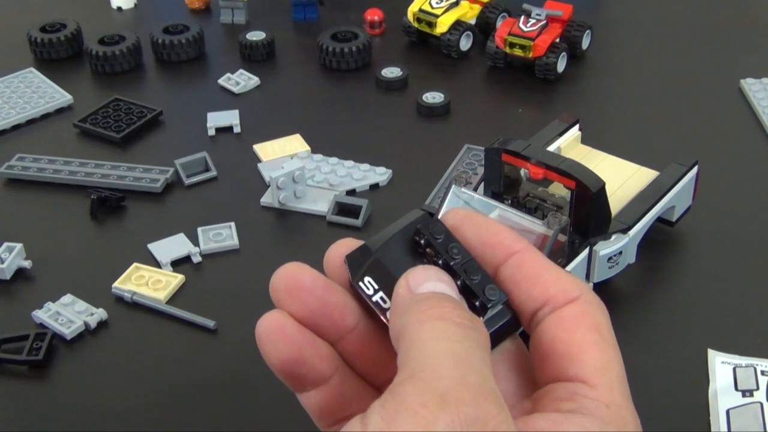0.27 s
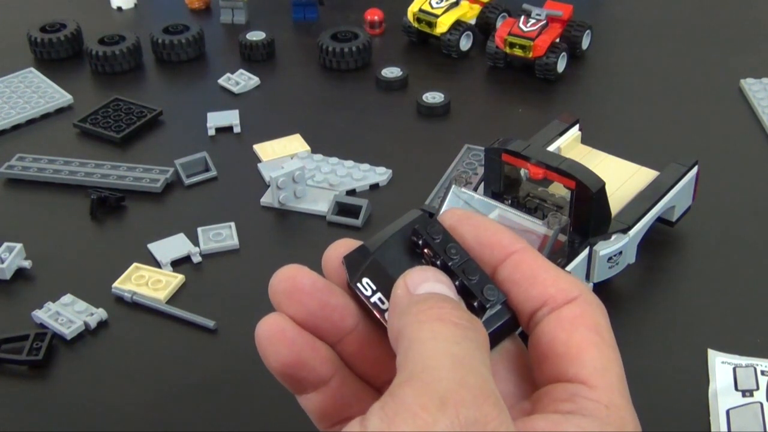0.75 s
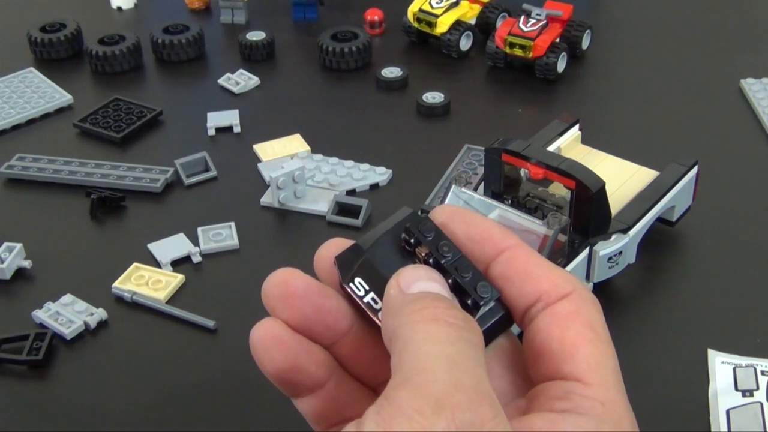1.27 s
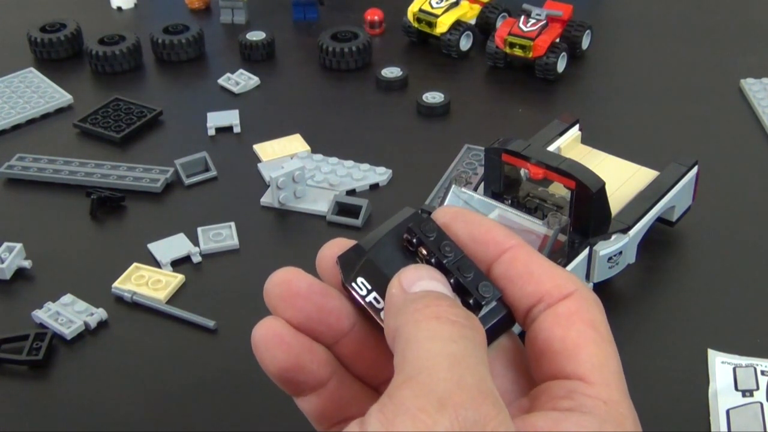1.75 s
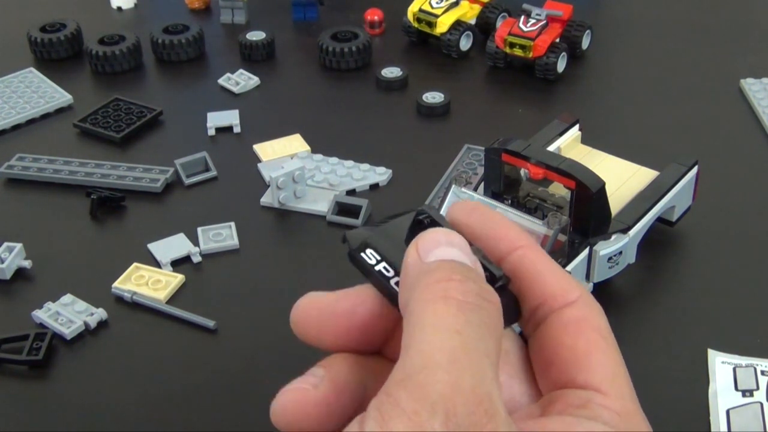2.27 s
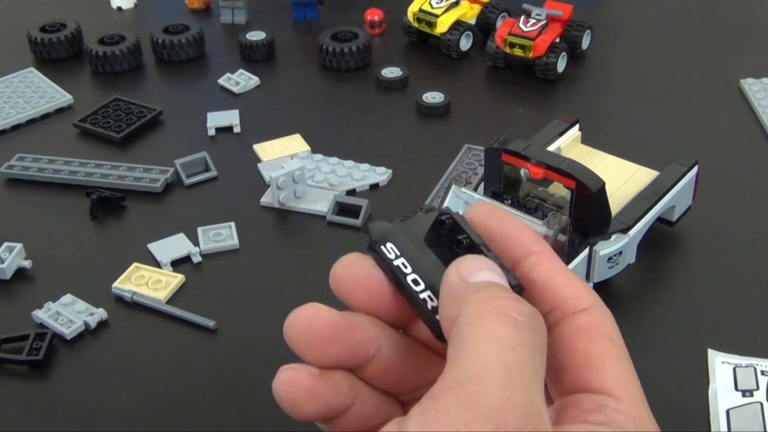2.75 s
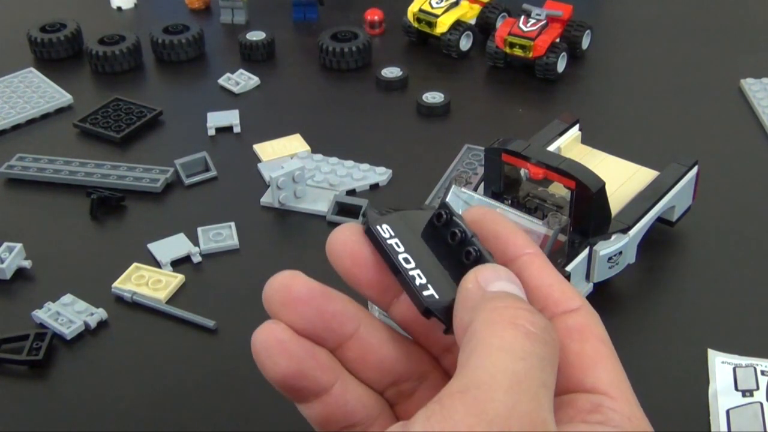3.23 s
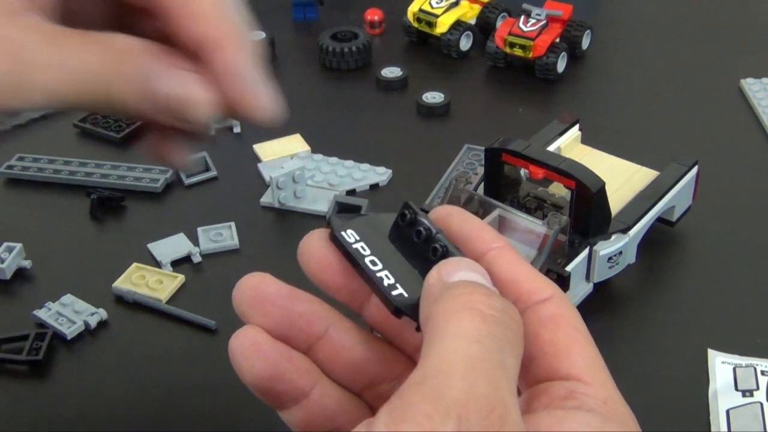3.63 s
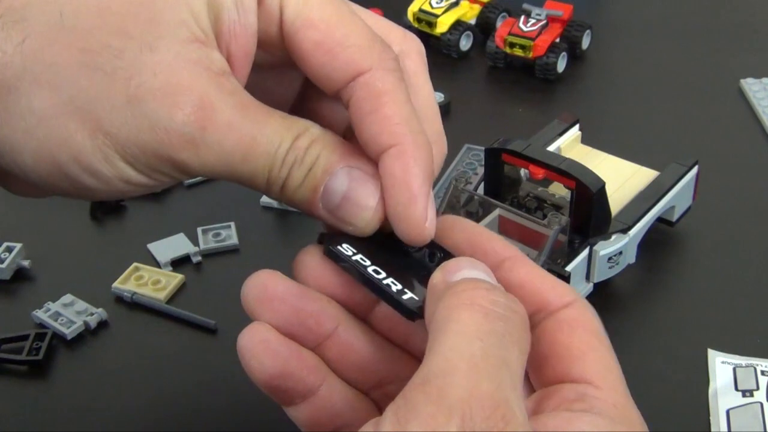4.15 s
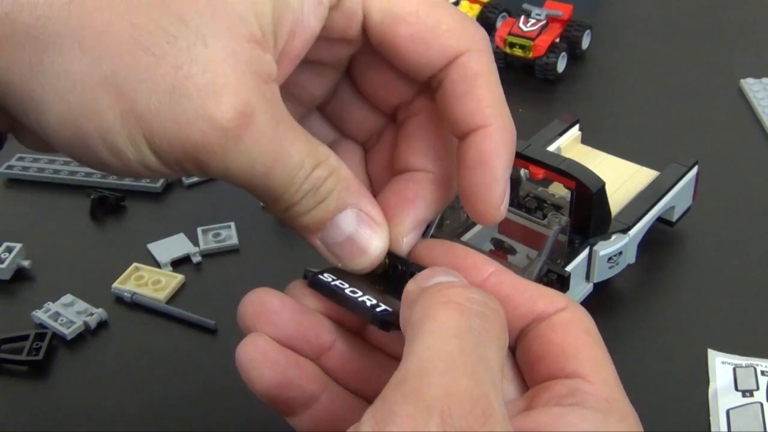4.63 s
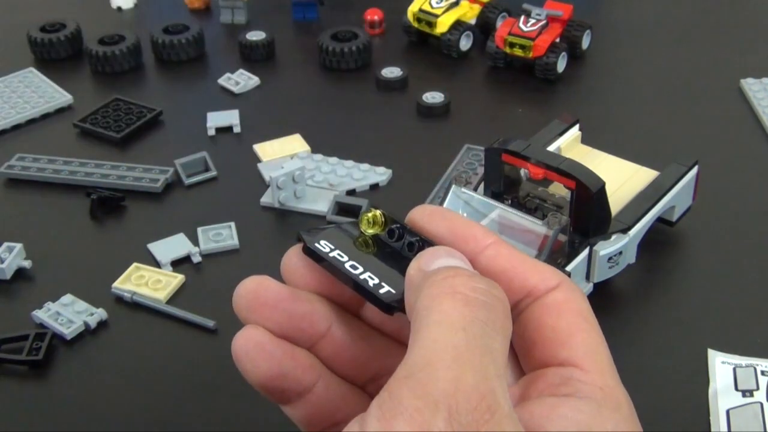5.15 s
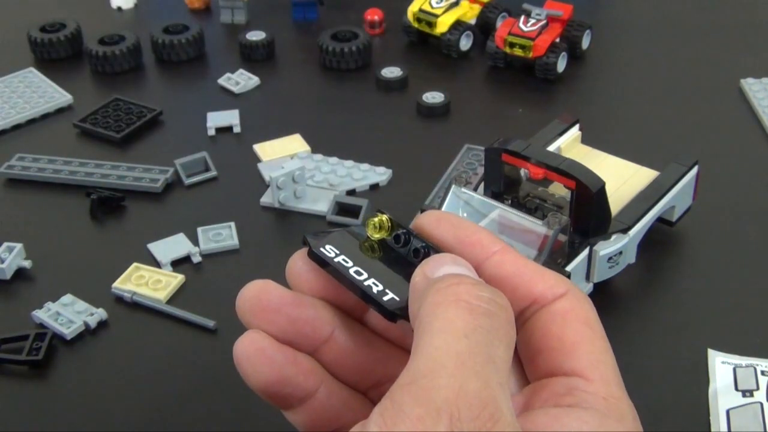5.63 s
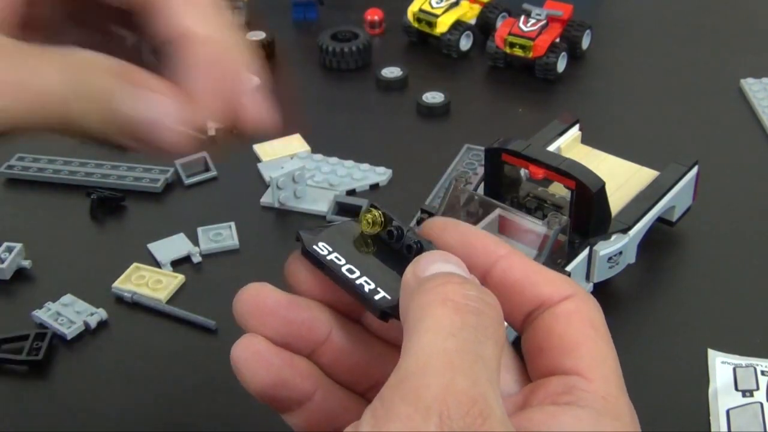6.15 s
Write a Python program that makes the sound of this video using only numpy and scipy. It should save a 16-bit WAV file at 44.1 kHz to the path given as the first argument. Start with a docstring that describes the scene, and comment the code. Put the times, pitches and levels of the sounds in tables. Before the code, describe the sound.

Small plastic toy bricks click and rattle on a desk, with fingers rubbing and soft knocks as a piece is pressed into place.

```python
"""A soft knock on a desk and the rub of fingers, close up: hands are building a toy from plastic bricks.
Loose plates clack and slide, then a small piece skitters, squeaks and is pressed onto its studs.
Each hit is a sharp contact with a dying chatter that rings the modes of plate, piece or desk;
rubs, scrapes and the squeak are trains of tiny stick-slip clicks.
A live room answers the bricks and the desk, over faint room noise and mains hum."""
import sys
import numpy as np
from scipy import signal
from scipy.fft import rfft, irfft, next_fast_len
from scipy.io import wavfile

SR = 44100
rng = np.random.default_rng(int(sys.argv[2]) if len(sys.argv) > 2 else 0)


def wrap_up_sound(samples):
    """Save the sound to the file named by the first command line argument, as 16-bit audio."""
    columns = np.atleast_2d(samples).T
    # keep every value between -1 and 1, then stretch to whole-number steps
    tamed = np.clip(columns, -1, 1)
    steps = np.round(tamed * 32767).astype(np.int16)
    wavfile.write(sys.argv[1], SR, steps)


N = 281975
TIME = np.arange(N) / SR
# the five registers of a hit, thud, knock, clack, snap and fizz: (frequency [Hz])
REGISTERS_HZ = [380, 1050, 2400, 4900, 10000]


def amp(db):
    """Decibels to gain."""
    return 10 ** (np.asarray(db) / 20)


def unit_rms(x):
    """Scales to rms 1."""
    return x / np.sqrt(np.mean(x ** 2) + 1e-20)


def curve(points, hz, column=1):
    """Reads one column of a table on a log-frequency axis."""
    table = np.transpose(points)
    return np.interp(np.log(hz + 1), np.log(table[0] + 1), table[column])


def add(mix, start_s, sound):
    """Lays a sound into the mix."""
    part = mix[max(round(start_s * SR), 0):][:len(sound)]
    part += sound[:len(part)]


def coloured(x, spectrum):
    """Equalises x with a spectrum, at rms 1."""
    size = next_fast_len(len(x))
    gain = amp(curve(spectrum, np.fft.rfftfreq(size, 1 / SR)))
    return unit_rms(irfft(rfft(x, size) * gain, size)[:len(x)])


def minimum_phase(gain):
    """The sharpest impulse response that has this gain."""
    phase = -signal.hilbert(np.log(np.r_[gain, gain[-2:0:-1]] + 1e-7)).imag
    return irfft(gain * np.exp(1j * phase[:len(gain)]))


def swells(strokes):
    """The envelope of short strokes that each swell and fade."""
    return sum(amp(db) * np.exp(-(2 * (TIME - s) / length) ** 2) for s, length, db in strokes)


def slips(per_s, spread_db, size=N):
    """A random train of tiny stick-slip clicks, a few of them large."""
    strength = amp(spread_db * np.minimum(rng.exponential(1, size), 4))
    return unit_rms(strength * rng.standard_normal(size) * (rng.random(size) < per_s / SR))


def handling(rumble_db, rub_db, grit_db, lumps_db=1.5):
    """Palms rumble in lumps, skin rubs softly and plastic edges grate, all following the hands' effort."""
    # how hard the hands work the toy: (time [s], effort [dB])
    grip = [(0, -65), (.22, -67), (.42, -56), (.6, -66), (.84, -72.5), (.92, -59.5), (1.48, -60.5),
            (1.75, -56), (2.05, -60), (2.32, -66.5), (2.55, -62), (2.8, -60), (3.1, -55.5), (3.6, -59.5),
            (3.95, -58), (4.15, -53.5), (4.4, -52), (4.58, -53.5), (4.73, -47), (4.88, -49), (5.25, -59.5),
            (5.4, -60), (5.55, -73.5), (5.75, -59), (5.92, -63), (6.38, -56)]
    # a finger shifts its hold: (middle [s], length [s], effort [dB])
    brushes = [(.03, 0.085, -60.5), (.31, 0.15, -57.5), (2.14, 0.15, -51), (2.97, .08, -54.5),
               (3.81, 0.15, -55.5), (5.665, 0.16, -49.5)]
    # a brick's edge grates across the studs: (middle [s], length [s], level [dB])
    grates = [(.04, 0.073, -85), (.33, 0.14, -68.5), (.905, 0.031, -68), (1.08, 0.29, -62.5),
              (1.98, 0.45, -61), (3.1, 0.15, -58.5), (4.84, 0.22, -58), (5.73, 0.065, -59.5)]
    # the tone of palms, skin and edges: (frequency [Hz], relative level [dB])
    palm_tone = [(15, -15), (30, -8.5), (55, -4.5), (130, -2.5), (220, -5.5), (320, -11.5), (600, -55)]
    skin_tone = [(130, -23.5), (260, 0.5), (420, 2.5), (650, -6.5), (1000, -6.5), (1400, -21.5),
                 (3000, -43)]
    edge_tone = [(600, -27.5), (1250, 5), (2400, -1.5), (3500, -11), (6000, -22.5), (12000, -19.5)]
    easy_db, rumble_growth, grit_growth = -57, 1.2, 0.95  # an easy grip; growth in dB per dB of effort
    effort = np.hypot(amp(np.interp(TIME, *np.transpose(grip))), swells(brushes))
    firmness = effort / amp(easy_db)
    rumble_gain = amp(easy_db + rumble_db) * firmness ** rumble_growth
    grit_gain = np.hypot(amp(easy_db + grit_db) * firmness ** grit_growth, swells(grates))
    wobble = coloured(rng.standard_normal(N), [(2, -20.0), (6, 1.0), (16, -2.5), (40, -76.5)])
    lumps = unit_rms(amp(lumps_db * wobble))
    rumble = rumble_gain * lumps * coloured(rng.standard_normal(N), palm_tone)
    rub = amp(rub_db) * effort * coloured(slips(per_s=2000, spread_db=2.1), skin_tone)
    grit = grit_gain * coloured(slips(per_s=6000, spread_db=2.0), edge_tone)
    return rumble + rub + grit


def hit_colour(strength_db, dullness, weight_db, note_hz):
    """Level per register: soft contacts lose treble, heavy ones add thud, a part favours its own note."""
    pivot_hz, hump_db, hump_octaves = 2400, 7.5, 1.16
    hz = np.array(REGISTERS_HZ)
    tilt = dullness * (hz - pivot_hz) / 1000
    hump = hump_db * np.exp(-(np.log2(hz / note_hz) / hump_octaves) ** 2)
    return strength_db - tilt + hump + weight_db * (hz == hz[0])


def strike(hits, modes, broadband_db, note_db, note_q, chatter_db, echo_s, echo_db, bass_db, size=8192):
    """A sharp contact, its echo off the desk and a dying chatter ring the body's modes at each hit."""
    hz, t = np.fft.rfftfreq(size, 1 / SR), np.arange(size) / SR
    bands = [np.interp(np.log(hz + 1), np.log(REGISTERS_HZ), row) for row in np.eye(len(REGISTERS_HZ))]
    bass_shelf = amp(curve([(40, 2 * bass_db), (130, bass_db), (300, 0.006)], hz))
    attack = t < .0075
    out = np.zeros(N)
    for s, strength_db, dullness, weight_db, t60, note_hz in hits:
        ringing = list(modes) + [(note_hz, note_hz / note_q, note_db)]
        resonance = sum(amp(db) ** 2 / (1 + (2 * (hz - f) / width) ** 2) for f, width, db in ringing)
        body = np.sqrt(amp(broadband_db) ** 2 + resonance)
        chatter_fade = amp(-60 * t / t60) + .1 * amp(-60 * t / 0.12)
        force = amp(chatter_db) * rng.standard_normal(size) * chatter_fade
        force[0] += 1
        force[round(SR * rng.uniform(.0004, .0009))] -= .55  # the second corner lands
        force[round(SR * echo_s * rng.uniform(.93, 1.07))] += amp(echo_db)
        ring = signal.fftconvolve(force, minimum_phase(body))[:size]
        # equalise the ring so that its attack has this hit's colour
        power = abs(rfft(ring * attack)) ** 2
        attack_db = np.array([10 * np.log10(np.average(power, weights=band)) for band in bands])
        boosts_db = hit_colour(strength_db, dullness, weight_db, note_hz) - attack_db
        eq = amp(sum(band * db for band, db in zip(bands, boosts_db)))
        add(out, s, signal.fftconvolve(ring, minimum_phase(eq * bass_shelf)))
    return out


def desk_knocks():
    """The hand knocks on the desk and rings its low modes."""
    # (time [s], strength [dB], dullness [dB/kHz], weight [dB], chatter t60 [s], note [Hz])
    hits = [(0.021, -41.5, 9.1, -4, 0.11, 750), (2.8162, -31.5, 6, 2, 0.022, 594),
            (2.9185, -21.5, 3.6, 9.5, 0.094, 937), (2.927, -18.5, 2.5, 5, 0.02, 426),
            (3.1472, -17.5, 1.9, 5.5, 0.025, 1720), (3.186, -17.5, 2.2, 12, 0.037, 610),
            (5.6052, -20, 7.2, 4, 0.14, 660), (5.693, -25.5, 4.8, 6, 0.064, 400)]
    # the desk's modes: (frequency [Hz], width [Hz], level [dB])
    modes = [(419, 22, 3.7), (662, 34, 5.5), (950, 69, 0.5), (1136, 93, 7.2), (1720, 120, 3)]
    return strike(hits, modes, broadband_db=-5, note_db=11.5, note_q=10,
                  chatter_db=-15, echo_s=.002, echo_db=-3, bass_db=-6)


def desk_thumps():
    """A soft push of the hand swings the desk for a few cycles."""
    # (time [s], level [dB], pitch [Hz], t60 [s])
    pushes = [(0.021, -47, 60, 0.089), (0.294, -40, 70, 0.088), (1.124, -43.5, 112, 0.098),
              (1.626, -32.5, 143, 0.058), (1.643, -33, 97.5, 0.097), (1.659, -39.5, 58, 0.17),
              (3.189, -38, 166, 0.045), (4.385, -38.5, 435, 0.057), (4.56, -37, 90, 0.054),
              (4.692, -35, 131, 0.079), (4.8922, -25.5, 92, 0.035), (5.15, -46, 45.6, 0.18),
              (5.932, -44, 107, 0.038), (6.0236, -35, 445, 0.016)]
    t, out = np.arange(SR // 3) / SR, np.zeros(N)
    for s, db, hz, t60 in pushes:
        add(out, s, -amp(db - 60 * t / t60) * np.sin(2 * np.pi * hz * t))
    return out


def plate_clacks():
    """Loose plates hit the desk and each other as fingers stir them."""
    # (time [s], strength [dB], dullness [dB/kHz], weight [dB], chatter t60 [s], note [Hz])
    hits = [(0.2925, -26, 5, 1.5, 0.049, 460), (0.9475, -26.5, 2.5, 12, 0.058, 1000),
            (0.975, -30, 3.5, 10, 0.036, 1030), (1.021, -27, 2.5, 1.5, 0.035, 2400),
            (1.0582, -12, 3, -1.5, 0.048, 990), (1.1725, -7, 3.5, -7, 0.016, 2320),
            (1.189, -16, 3, -3, 0.11, 990), (1.2185, -5, 3.5, -9, 0.014, 2400),
            (1.2222, -1.5, 4, -14, 0.035, 1760), (1.2335, -8.5, 3, -18, 0.069, 2060),
            (1.25, -22, 0.0, 3, 0.032, 2400), (1.2912, -3.5, 1.7, -4.5, 0.023, 3500),
            (1.362, -23, -0.2, 3.5, 0.015, 1700), (1.5408, -4, 0.7, 0, 0.069, 2900),
            (1.5492, -6.5, 2, -8.5, 0.038, 1110), (1.5655, -7, 0.5, -3, 0.043, 1120),
            (1.5742, -4, 4.5, -17.5, 0.023, 1110), (1.601, -14, -0.1, 14.5, 0.16, 1040),
            (1.616, -7, 1.2, -8, 0.17, 1810), (1.6502, 4.5, 1.87, -16, 0.028, 5300),
            (1.8478, -15, 0.9, 4, 0.035, 2420), (5.4165, -18.5, 2.5, 8.5, 0.13, 890),
            (5.7418, -11.5, 2, -5, 0.027, 1150), (5.767, -22.5, 3, -6, 0.02, 1810)]
    # a plate's modes: (frequency [Hz], width [Hz], level [dB])
    modes = [(576, 36, 0), (894, 29, 4.5), (1123, 150, 1.5), (1298, 60, -7.5), (1810, 150, 0.5),
             (2060, 50, -5.5), (2960, 110, 2.5), (3970, 89.9, -13), (5100, 160, -2)]
    return strike(hits, modes, broadband_db=-0.5, note_db=5.5, note_q=20,
                  chatter_db=-13, echo_s=.0018, echo_db=0, bass_db=-1.5)


def plastic_scrapes(size=16384):
    """Plastic slides on plastic: dense slips in one broad resonance, swelling and fading."""
    # (middle [s], length [s], level [dB], centre [Hz], width [Hz])
    slides = [(0.987, 0.1, -67, 4500, 4060), (.992, 0.0053, -57, 9500, 7000),
              (1.271, 0.028, -35, 7040, 11300), (1.316, 0.12, -46, 2260, 2200),
              (1.585, 0.11, -44, 2180, 4030), (1.624, 0.012, -34, 5660, 1695),
              (1.768, 0.14, -53, 6800, 10030), (1.999, 0.47, -73, 4420, 4940), (2.52, 0.2, -85, 4530, 600),
              (3.42, 0.057, -39.5, 4900, 9100), (3.476, 0.037, -46, 4440, 8000),
              (4.85, 0.14, -70, 9000, 8850), (5.434, 0.054, -58.5, 2500, 1680),
              (5.707, 0.065, -74, 3930, 4000), (5.777, 0.061, -71.5, 5660, 1810)]
    hz, t = np.fft.rfftfreq(size, 1 / SR), (np.arange(size) - size // 2) / SR
    out = np.zeros(N)
    for s, length, db, centre, width in slides:
        friction = slips(per_s=7000, spread_db=3.6, size=size)
        grain = unit_rms(irfft(rfft(friction) / (1 + (2 * (hz - centre) / width) ** 4)))
        swell = np.cos(np.pi * np.clip(t / length, -.5, .5))
        add(out, s + t[0], amp(db) * grain * swell)
    return out


def piece_ticks():
    """A small hard piece bounces, or catches on a stud, with a bright tick."""
    # (time [s], strength [dB], dullness [dB/kHz], weight [dB], chatter t60 [s], note [Hz])
    hits = [(2.8888, -26.5, 1.5, -3, 0.034, 1090), (2.9378, -10.5, 1.3, -13.5, 0.016, 4900),
            (3.1515, -8, 1.5, 0.5, 0.022, 580), (3.1812, -5.5, 0.7, 0.5, 0.019, 5100),
            (3.2271, 2, 1, -10, 0.021, 2950), (3.2687, 0, 2, -14.5, 0.026, 2700),
            (3.3004, -2.5, 0.5, -9, 0.021, 2450), (3.329, -11, 1.5, -3, 0.02, 5450),
            (3.3421, -1.5, 0.0, -15, 0.075, 2250), (3.3837, -6.5, 1.5, -5, 0.056, 4960),
            (3.3912, -9, -0.5, -12, 0.017, 5150), (3.4084, -8, 0.5, -11, 0.026, 2400),
            (3.4154, -6.5, 0.5, -13, 0.019, 5660), (3.4268, -14.5, -0.5, 3, 0.034, 1000),
            (3.448, -7.5, 0.8, -6, 0.034, 5100), (3.4655, -13.5, -0.5, -7, 0.027, 4500),
            (3.4745, -18, 0.3, 5.5, 0.011, 4910), (4.31, -44.5, -0.5, 6, 0.008, 11400),
            (4.383, -35.5, 0.7, 7.5, 0.027, 11400), (4.5315, -31.5, 4, 1, 0.015, 602),
            (4.8921, -21.5, 0.6, 13.5, 0.01, 2400), (6.35, -27.5, 3.5, -0.5, 0.017, 828)]
    # the piece's modes: (frequency [Hz], width [Hz], level [dB])
    modes = [(940, 150, 4.5), (1610, 90, -5), (2386, 56.2, -0.5), (2770, 110, 5), (4120, 120, -10),
             (4910, 330, 2), (5430, 140, -7)]
    return strike(hits, modes, broadband_db=0.5, note_db=6.5, note_q=14,
                  chatter_db=-19, echo_s=.0019, echo_db=-7, bass_db=0.5)


def piece_squeak(middle_s=4.172, length_s=0.094, level_db=-60.5, sharpness=3.2):
    """Quick slips ring the small piece as it is twisted home, loudest halfway through the twist."""
    # the squeaking modes: (frequency [Hz], width [Hz], level [dB])
    modes = [(3650, 340, 2), (4140, 170, 1.5), (6550, 236, -6.5), (11700, 350, -2)]
    hz = np.fft.rfftfreq(N, 1 / SR)
    body = sum(amp(db) / (1 + (2 * (hz - f) / width) ** 2) for f, width, db in modes)
    ring = unit_rms(irfft(rfft(slips(per_s=3000, spread_db=2.0)) * body, N))
    twist = np.exp(-2 * sharpness * abs(TIME - middle_s) / length_s)
    return amp(level_db) * twist * ring


def room_reverb(x, wet_db, build_s, tail_db=-17, tail_t60=0.78):
    """Dense reflections build up, then each band dies at its own speed over a faint long tail."""
    # the room's decay: (frequency [Hz], early t60 [s], level [dB])
    decay = [(99, 0.18, -4.5), (400, .5, -0.5), (1000, 0.32, 0.5), (2500, 0.24, -5), (5300, 0.39, -11),
             (10980, 0.23, -3.5)]
    t = np.arange(SR) / SR
    build_up = np.clip((t - .003) / build_s, 0, 1)
    reflections = rng.choice([-1., 1.], SR) * (rng.random(SR) < .15) * build_up
    hz, when, bands = signal.stft(unit_rms(reflections), SR, nperseg=256)
    fade = amp(-60 * when / curve(decay, hz)[:, None]) + amp(tail_db - 60 * when / tail_t60)
    energy = SR * np.mean(fade ** 2, axis=1, keepdims=True)
    fade *= amp(curve(decay, hz, column=2))[:, None] / np.sqrt(energy)
    response = signal.istft(bands * fade, SR, nperseg=256)[1]
    return amp(wet_db) * signal.fftconvolve(x, response)[:N]


def scene():
    """Desk and bricks sound in the room; the handling stays dry."""
    clacks, ticks, knocks = plate_clacks(), piece_ticks(), desk_knocks()
    desk = clacks + amp(2.5) * knocks + desk_thumps() + plastic_scrapes()
    piece = amp(-0.4) * ticks + piece_squeak()
    reverb = room_reverb(desk + amp(-1.5) * piece, wet_db=-1.0, build_s=0.0038)
    hands = handling(rumble_db=-0.5, rub_db=-1.5, grit_db=-16.5)
    return (desk + piece + reverb + hands)[None]


def record(dry, noise_db=-67.5, cutoff_hz=12050, size=2048):
    """The microphone softens the treble; room noise and mains hum join ahead of a steep low-pass."""
    # the microphone's colour: (frequency [Hz], gain [dB])
    microphone = [(20, 1.5), (5800, -1), (7000, -6), (7700, -14), (8300, -25), (9300, -22), (10300, -13.5),
                  (11800, -14)]
    # steady room noise: (frequency [Hz], relative level [dB])
    room_tone = [(20, -9.5), (40, -8.5), (80, -9), (160, -9), (250, -9), (430, -8.5), (800, -14),
                 (1500, -21.5), (2200, -27), (3400, -44.5), (6000, -46.5), (12000, -45)]
    # mains hum: (frequency [Hz], level [dB])
    hum_partials = [(120, -66), (240, -72.5)]
    colour = minimum_phase(amp(curve(microphone, np.fft.rfftfreq(size, 1 / SR))))
    heard = signal.fftconvolve(dry, colour[None])[:, :N]
    noise = amp(noise_db) * coloured(rng.standard_normal(N), room_tone)
    hum = sum(amp(db) * np.sqrt(2) * np.sin(2 * np.pi * hz * TIME) for hz, db in hum_partials)
    low_pass = signal.firwin(141, cutoff_hz, window=("kaiser", 8), fs=SR)
    return signal.oaconvolve(heard + noise + hum, low_pass[None], "same")


dry = scene()
out = record(dry)
wrap_up_sound(out)
```